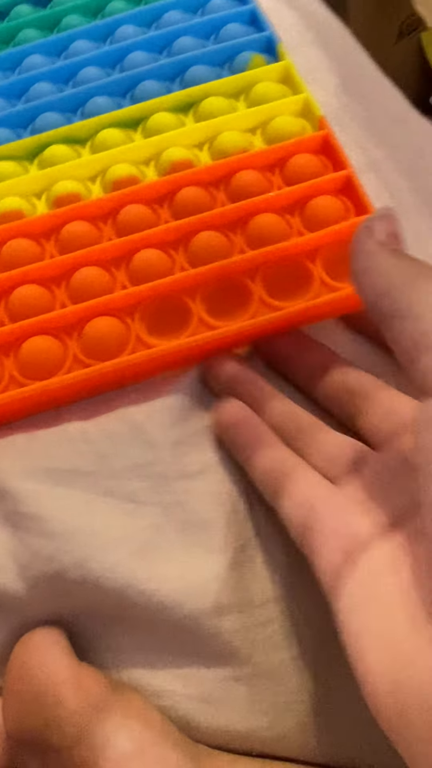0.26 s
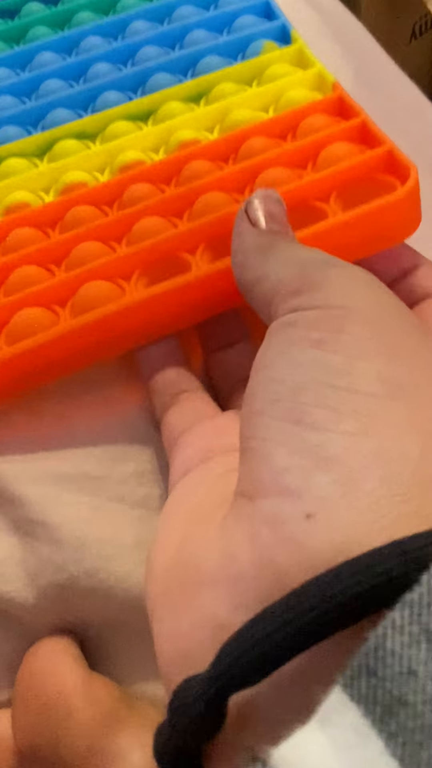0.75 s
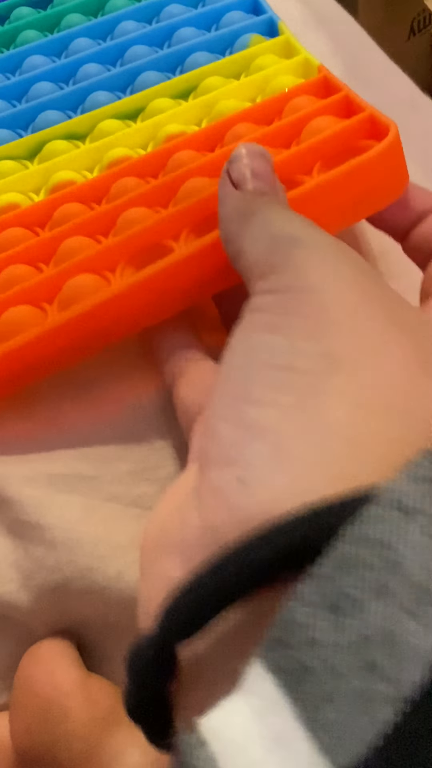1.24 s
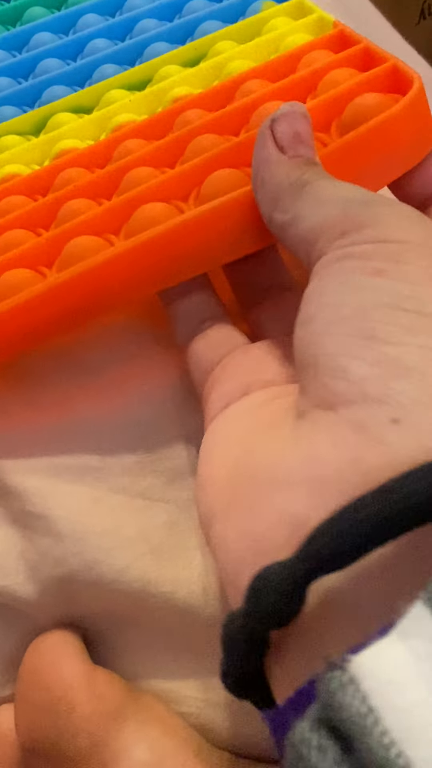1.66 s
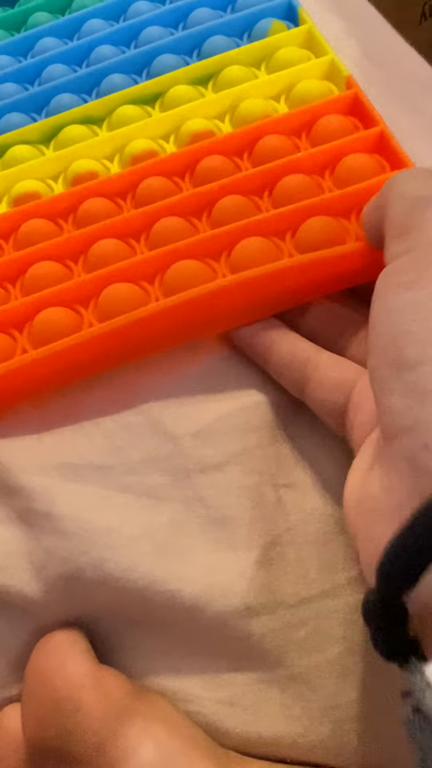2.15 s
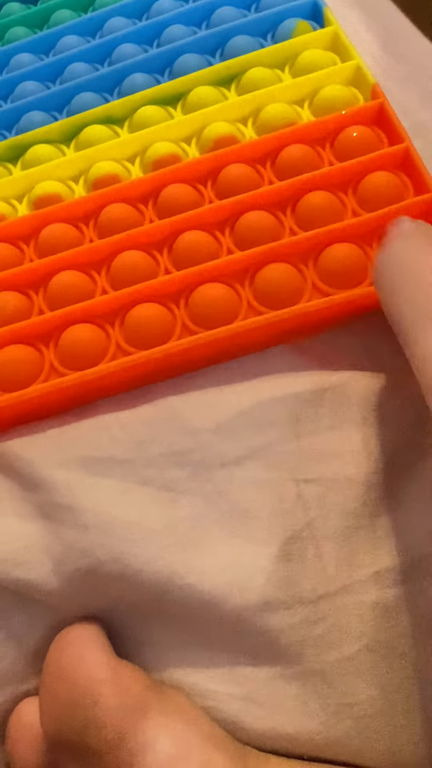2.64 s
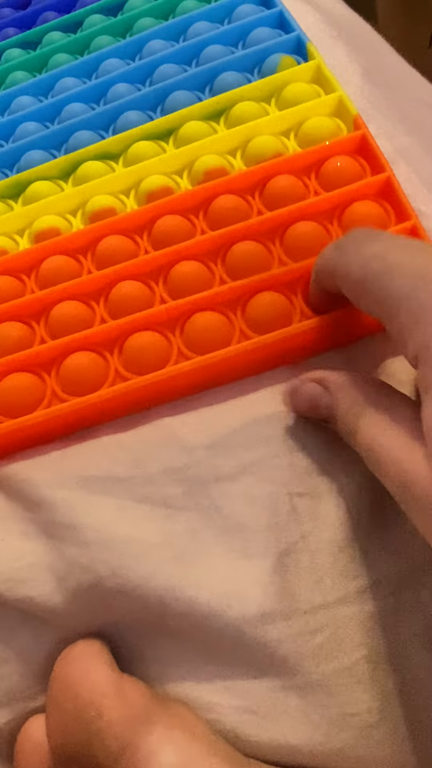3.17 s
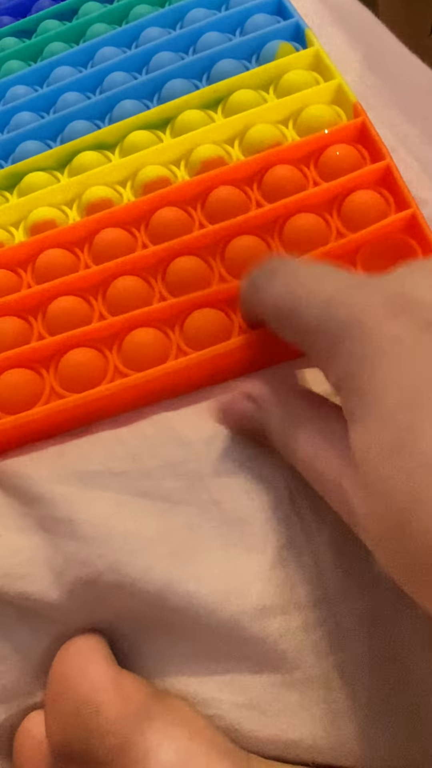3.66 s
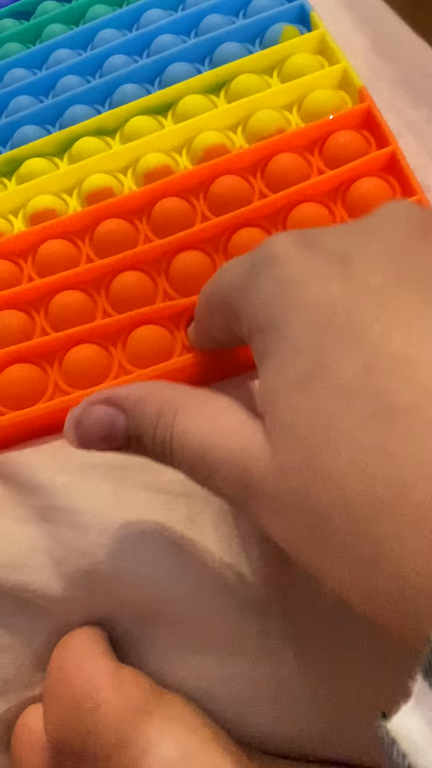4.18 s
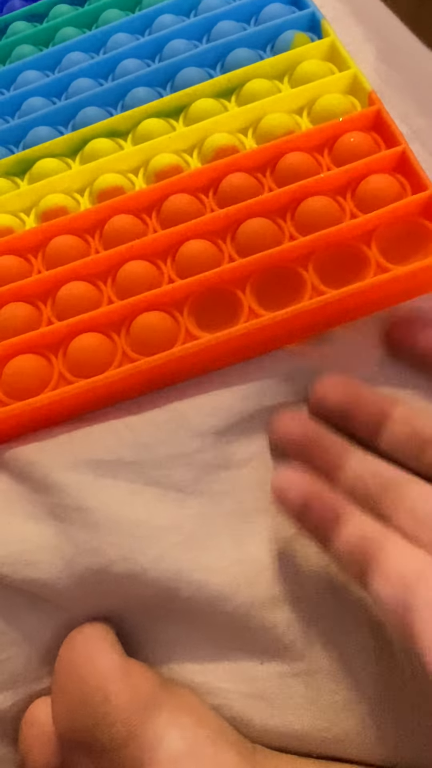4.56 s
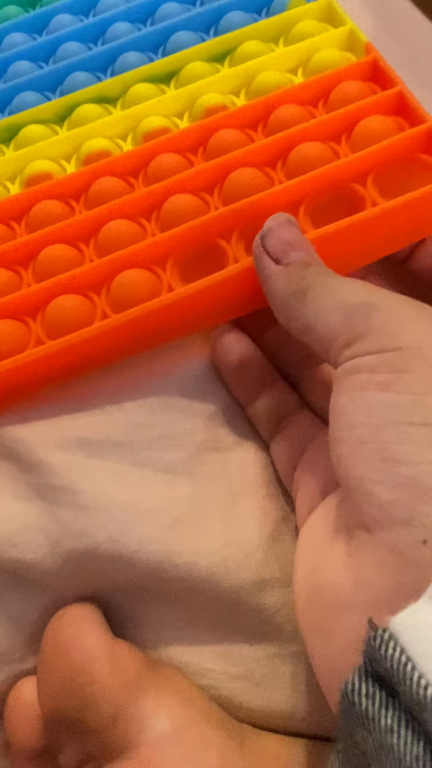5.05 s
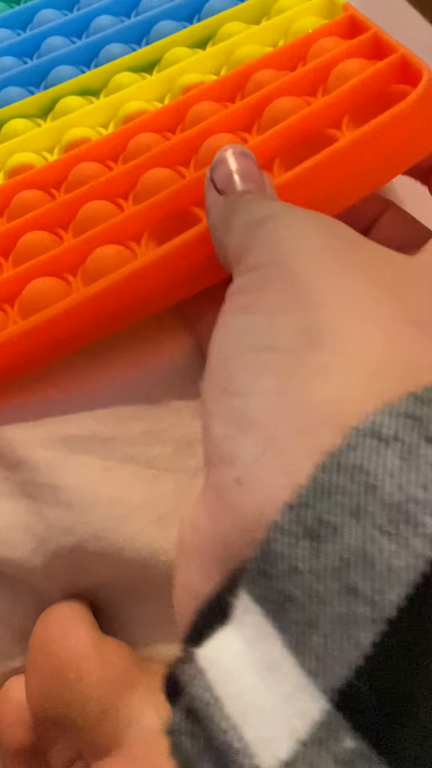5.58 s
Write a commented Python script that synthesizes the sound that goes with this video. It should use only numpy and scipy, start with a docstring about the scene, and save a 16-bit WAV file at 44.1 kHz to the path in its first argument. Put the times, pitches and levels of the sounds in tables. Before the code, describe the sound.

A hand handles a silicone bubble fidget toy on bedding, close to the microphone. Soft thumps, cloth brushing and a few faint pops lead to a quick cluster of sharp pops. Light clicks and skin rubbing follow, then two more distinct pops and a last brush of fabric. A low hum and rumble fill the small room throughout.

```python
"""Domes of a soft silicone sheet snap through under fingertips, each a short falling pop.
The sheet flexes with low thumps, skin sticks and slips on it, and hand and sheet brush the bedding.
All of it is close to a pair of microphone ports, where the moving hand stirs the air.
A low hum and rumble fill the small room."""
import sys
import numpy as np
from scipy import signal
from scipy.fft import rfft, irfft
from scipy.io import wavfile

SR = 44100
rng = np.random.default_rng(int(sys.argv[2]) if len(sys.argv) > 2 else 0)


def transcribe(u):
    """Save the signal u as a 16-bit wav file named by the first command-line argument.

    u: samples, shape (n,) or (channels, n), limited to [-1, 1]; the rate is SR.
    q: integer samples, one column per channel.
    """
    v = np.clip(np.atleast_2d(u).T, -1, 1)
    q = np.round(v * 32767).astype(np.int16)
    wavfile.write(sys.argv[1], SR, q)


N = 256662

# dome snaps: t/s, level/dB, pocket f/Hz, glide/ratio, t60/cycles, wall f/Hz, wall/dB, snap f/Hz, snap/dB,
# fizz/dB, left-right/dB; wall, snap and fizz re level
POPS = [(0.145, -45, 940, 1.5, 4.9, 2330, 4.5, 5350, -3, -14, -4),
        (0.773, -40.5, 770, 0.17, 22, 3000, -48, 5500, -49, -50, 4),
        (1.0762, -45.5, 730, 0.52, 13, 3000, -43, 5500, -42, -40, 2),
        (1.4590, -26, 606, 4.9, 3.7, 2370, -6.5, 6400, -18.5, -13, -0.5),
        (1.5146, -14, 1160, 3.1, 6.7, 3160, -5, 5780, -11, -20.5, -0.5),
        (1.571, -20.5, 765, 4.07, 4.4, 1990, -4, 6300, -19.5, -11.5, -0.5),
        (1.5915, -17.5, 1427, 0.57, 11.4, 2460, 0.5, 5740, -0.5, -21, 0),
        (1.697, -41.5, 870, 2.2, 5.3, 2700, 0.5, 5990, -3, -2, -2),
        (1.701, -34, 1317, 0.33, 3.8, 2530, -14, 6760, -7, -6, 0),
        (2.1937, -38.5, 1810, 0.32, 5.3, 3230, -0.5, 5560, -8, -1, -1),
        (2.823, -58, 2360, 0.3, 8.6, 2860, -12, 6300, 3.5, -0.5, -2),
        (3.131, -41.5, 1740, 0.47, 7.3, 3250, -4, 6500, -10, 5.5, 2.5),
        (3.289, -70, 1600, 0.5, 4.2, 3000, -3, 5000, -1, -10, 0),
        (3.534, -77, 2020, 0.21, 5.3, 3030, -20.5, 5640, 18.5, 4, 1),
        (3.614, -55.5, 1665, 0.72, 7.6, 2200, -3.5, 5480, -18.5, -24, 5),
        (3.6704, -28, 1110, 1.66, 3.8, 2350, -5, 5830, -21.5, -12.5, 0),
        (3.806, -52.5, 1990, 0.14, 19, 3500, -9, 6310, -6.5, -10.5, -0.5),
        (3.934, -49.5, 1154, 2.1, 7.3, 2420, -4.5, 5530, -10.5, -12, 1.5),
        (4.105, -60.5, 987, 1.6, 5.4, 3050, -14.5, 5520, -14, -13.5, -4),
        (4.2233, -25.5, 1100, 1.06, 8.4, 2770, -5.5, 5400, -3, -20.5, 0),
        (4.242, -63.5, 2400, 0.3, 5, 4000, 7.5, 5740, 11, 4, 2),
        (4.356, -75, 2390, 0.3, 5, 4600, 4, 6200, 5, 1.5, 3.5),
        (4.445, -71, 2400, 0.3, 5, 4630, 1, 6200, 4, 17, 1),
        (4.599, -40.5, 1580, 0.92, 17, 3030, -8, 5400, -11, -1, -2.5)]
# sheet flexes: t/s, level/dB, final f/Hz, t60/s
THUMPS = [(0.272, -36.5, 297, 0.02), (0.297, -33.5, 290, 0.049), (0.309, -34, 290, 0.027),
          (0.425, -29, 60.5, 0.089), (0.504, -34.5, 98.4, 0.22), (0.827, -25, 64, 0.1),
          (0.867, -36, 63, 0.077), (1.322, -35, 65.3, 0.19), (2.028, -33, 68.4, 0.085),
          (2.274, -29.5, 73.4, 0.21), (2.405, -36.5, 74.4, 0.25), (2.478, -33, 56, 0.22),
          (3.1312, -31.5, 317, 0.024), (3.137, -29.5, 71, 0.039), (3.6709, -30.5, 266, 0.022),
          (3.675, -27, 59.4, 0.028), (3.784, -36.5, 82, 0.11), (3.892, -32, 78.2, 0.15),
          (4.169, -37, 92, 0.11), (4.2236, -35.5, 196, 0.017), (4.598, -34.5, 414, 0.024),
          (4.738, -36, 410, 0.022), (5.241, -26.5, 82, 0.06), (5.31, -37, 69, 0.064)]
# fingertip drags: start t/s, end t/s, level/dB, centre f/Hz, band edge/centre
SCRAPES = [(0.225, 0.328, -53, 422, 1.24), (1.14, 1.257, -80, 4730, 0.66), (1.067, 1.26, -86, 4940, 1.07),
           (2.621, 2.695, -57.5, 1880, 1.25), (2.677, 2.715, -48, 2040, 1.13),
           (2.683, 2.715, -52.5, 1040, 1.38), (4.596, 4.751, -56, 1150, 1.2),
           (4.597, 4.74, -56, 2350, 1.18), (4.63, 4.76, -60, 550, 1.07), (4.715, 4.755, -56, 940, 1.2),
           (5.268, 5.382, -69.5, 2030, 1.6)]
# strokes over cloth: hold from t/s, hold to t/s, bright level/dB, dull level/dB, swell/s, fade/s
# swell and fade per 20 dB, floored at 0.02 s
STROKES = [(0.092, 0.162, -57.5, -57, 0.04, -0.04), (0.244, 0.292, -51.5, -50.5, 0.17, 0.2436),
           (0.353, 0.355, -70, -60.5, 0.46, 0.36), (0.406, 0.513, -71.5, -78, 0.5, -0.13),
           (0.52, 0.608, -62.5, -66.5, -0.96, 0.13), (0.644, 0.666, -68.5, -67, 0.2, 0.14),
           (0.77, 0.785, -78.5, -70.5, 0.04, 0.6), (0.922, 1.01, -74, -69.5, 0.1, 1.5),
           (1.272, 1.357, -68.5, -73.5, -0.3, 0), (1.97, 2.026, -81, -71, 1.3, 8),
           (2.103, 2.116, -59.5, -63, 0.1, 0.2), (2.2, 2.216, -67, -76.5, -9, 0),
           (2.294, 2.34, -69, -81, -0.7, 0.5), (2.373, 2.43, -64.5, -76.5, 0, -0.08),
           (2.47, 2.584, -65.5, -69, -0.35, 0.46), (2.632, 2.67, -62.5, -66, 0.1, -0.03),
           (2.685, 2.708, -55, -53.5, -0.01, -0.09), (2.733, 2.845, -68.5, -69.5, 0.46, -0.12),
           (2.96, 2.994, -76.5, -83.5, -4, -0.03), (3.092, 3.127, -72, -75, -0.34, -0.05),
           (3.13, 3.186, -63.5, -64, 0.025, -0.07), (3.64, 3.67, -78.5, -77, -0.13, 0.07),
           (3.285, 3.308, -79, -75, 0.03, -0.9), (3.364, 3.432, -81, -80, 0.1, -0.05),
           (3.696, 3.828, -77, -81.5, 0.3, -0.1), (3.945, 3.956, -77.5, -73, 0.04, 0.17),
           (4.407, 4.495, -74.5, -79.5, 0.14, 0.6), (4.542, 4.567, -60.5, -70.5, 0.07, 0.07),
           (4.603, 4.728, -52, -52.5, 0.0334, 0.11), (4.767, 4.81, -61.5, -66.5, 0.15, 0.17),
           (4.883, 4.968, -60.5, -67.5, 0, 0.09), (5.272, 5.367, -66.5, -68, 0.15, 0.14),
           (5.43, 5.507, -70, -78, 0, 0.2), (5.54, 5.641, -69, -76.5, 0, 0.1),
           (5.799, 5.83, -71.5, -78.5, 0, 0.1)]
# cloth friction spectra, bright and dull: f/Hz, level/dB
CLOTH_BRIGHT = [(1500, -19), (1900, -5.5), (2400, 3), (2800, -3.5), (3300, 1), (4200, 0.5), (4800, -2),
                (5500, 3), (6500, 0), (7800, -1), (9000, -7.5), (11000, -12.5), (12400, -12), (13500, -18),
                (15500, -20), (16500, -38.5)]
CLOTH_DULL = [(220, -17.5), (400, 10.5), (560, 2), (780, 2), (1100, 0.5), (1600, -5.5), (2300, -10.5),
              (3000, -34)]
# edges of the hiss bands: f/Hz
HISS_EDGES_HZ = [1000, 2800, 4800, 8500, 16000]
# air stirred by the hand: start t/s, end t/s, level/dB, centre f/Hz
STIRS = [(0.205, 0.346, -52, 400), (1.433, 1.485, -41.5, 600), (1.489, 1.557, -44, 790),
         (1.565, 1.606, -45, 750), (2.235, 2.366, -48, 250), (2.64, 2.72, -42.5, 450), (3.1, 3.2, -48, 403),
         (3.68, 3.8, -51, 348), (4.207, 4.248, -46, 900), (4.35, 4.556, -49, 300), (4.401, 4.52, -59, 720),
         (4.585, 4.77, -48.5, 600), (5.5, 5.618, -51.5, 347)]
# left port's lead on near sounds: f/Hz, phase/rad
PORT_LEAD = [(300, .1), (2000, .4), (3400, 1.4), (5500, 1.6), (7600, 2.2), (8600, 2.9), (10400, 3.3),
             (11700, 3.9), (13700, 4.2), (16000, 5.7)]
# room rumble spectra, in phase and opposed at the ports: f/Hz, level/dB
RUMBLE_COMMON = [(12, -39.5), (20, -12.5), (38, 0.5), (70, 0), (143, -8), (221, -5), (308, -8), (341, -7.5),
                 (369, -10.5), (398, -8), (716, -35), (1110, -47), (3500, -66), (5540, -63.5), (9000, -81),
                 (11700, -109), (19800, -120)]
RUMBLE_OPPOSED = [(12, -51), (20, -20), (60, -13.5), (98, -3.5), (249, -14.5), (397, -10.5), (551, -15),
                  (1220, -24), (1480, -33), (2290, -35.5), (3100, -39.5), (4080, -47), (14000, -65.5)]
# hum tones: f/Hz, width/Hz, level/dB
HUM = [(83.25, 5, -55), (118.7, 1.8, -54.5), (232.2, 8, -64.5), (300.4, 8, -63), (393.4, 3, -63)]


def pops():
    """A dome's air pocket rings, falling as it opens; wall, snap, rim, fizz and a low push join it."""
    push_hz, rim_hz, fizz_peak_s, silicone_top_hz = 558, 4150, 0.00069, 11800
    push = falling_ring(push_hz, t60_s=0.0053, rise_s=0.00065, glide=0.54, glide_s=0.001)
    rim = falling_ring(rim_hz, t60_s=0.0028, rise_s=0.00034, glide=0.2, glide_s=0.00037)
    age = np.arange(300) / SR / fizz_peak_s
    bursts = rng.standard_normal((len(POPS), len(age))) * age * np.exp(1 - age)
    fizzes = butter(bursts, [7300, 10900], "band")
    out = np.zeros((2, N))
    for pop, fizz in zip(POPS, fizzes):
        at_s, db, hz, glide, cycles, wall_hz, wall_db, snap_hz, snap_db, fizz_db, pan_db = pop
        pocket = falling_ring(hz, t60_s=cycles / hz, rise_s=0.45 / hz, glide=glide, glide_s=0.4 / hz)
        wall = falling_ring(wall_hz, t60_s=0.0036, rise_s=0.00045, glide=0.13, glide_s=0.00053)
        snap = falling_ring(snap_hz, t60_s=0.0026, rise_s=0.00031, glide=0.078, glide_s=0.00023)
        sides = from_db(db + np.array([[pan_db], [-pan_db]]) / 2)
        rings = [(-pocket, 0), (push, -12.5), (wall, wall_db), (-snap, snap_db), (rim, snap_db - 3.5)]
        for ring, ring_db in rings:
            add(out, sides * from_db(ring_db) * ring, at_s)
        add(out, sides * from_db(fizz_db) * fizz, at_s - 0.0005)
    out = butter(out, silicone_top_hz, order=5)
    thin = butter(out, [1400, 6500], "band")
    pre_tick = from_db(-23) * np.roll(thin, -round(0.0076 * SR), axis=1)
    bounce = from_db(-20.5) * np.roll(out, round(0.0028 * SR), axis=1)   # off hand and bedding
    wall_echo = from_db(-22.5) * np.roll(thin, round(0.0102 * SR), axis=1)
    return out + pre_tick + bounce + wall_echo


def thumps():
    """The slack sheet swings, slowing as it settles; a harder flex starts tauter."""
    taut_hz, doubling_db = 260, 9
    out = np.zeros(N)
    for at_s, db, hz, t60_s in THUMPS:
        excess_hz = taut_hz * 2 ** ((db + 30) / doubling_db)
        ring = falling_ring(hz, t60_s, rise_s=0.0033, glide=excess_hz / hz, glide_s=0.0028)
        add(out, from_db(db) * ring, at_s)
    return out * from_db([[-0.3], [0.3]])


def scrapes():
    """Skin sticks and slips on the sheet; each slip rings a resonance."""
    slips_per_s, attack_s, release_s = 900, 0.0063, 0.017
    t, out = np.arange(N) / SR, np.zeros(N)
    slips = (rng.random(N) < slips_per_s / SR) * rng.standard_normal(N)
    slips += 0.098 * rng.standard_normal(N)
    for start_s, end_s, db, hz, edge_ratio in SCRAPES:
        envelope = np.clip(np.minimum((t - start_s) / attack_s, (end_s - t) / release_s), 0, 1)
        out += from_db(db) * envelope * unit_band(slips, hz, max(edge_ratio, 1.07))
    return out


def brushing_gains():
    """Bright and dull gains: strokes, a jolt of the sheet per pop and faint resting rub add in power."""
    jolt_bright_db, jolt_dull_db, jolt_swell_s, jolt_fade_s = -35.5, -35, 0.017, 0.054
    rest_bright_db, rest_dull_db = -95.5, -81
    jolts = [(at_s, at_s, db + snap_db + jolt_bright_db, db + jolt_dull_db, jolt_swell_s, jolt_fade_s)
             for at_s, db, *_, snap_db, _fizz_db, _pan_db in POPS]
    t = np.arange(0, N, 64) / SR
    power = from_db([[rest_bright_db], [rest_dull_db]]) ** 2
    for start_s, end_s, bright_db, dull_db, swell_s, fade_s in STROKES + jolts:
        before = (start_s - t) / max(swell_s, 0.02)
        after = (t - end_s) / max(fade_s, 0.02)
        drop_db = 20 * np.clip(np.maximum(before, after), 0, None)
        power = power + from_db(np.array([[bright_db], [dull_db]]) - drop_db) ** 2
    return [np.interp(np.arange(N) / SR, t, gain) for gain in np.sqrt(power)]


def brushing():
    """Cloth rubbing: a dense, grainy hiss, with random level flicker added per band."""
    bright_gain, dull_gain = brushing_gains()
    grains = rng.standard_normal((3, N)) * from_db(3.5 * rng.standard_normal((3, N)))
    cloth = grains[0] + from_db(-31.5) * grains[1:]   # one shared spot, a wider patch per port
    spectrum, hz = rfft(coloured(cloth, CLOTH_BRIGHT)), np.fft.rfftfreq(N, 1 / SR)
    bright = np.zeros((2, N))
    for low_hz, high_hz in zip(HISS_EDGES_HZ, HISS_EDGES_HZ[1:]):
        flicker = from_db(2.0 * drift(7.2) + 0.38 * drift(35))
        bright += flicker * irfft(spectrum * (hz >= low_hz) * (hz < high_hz), N)
    dull = from_db(2.1 * drift(18)) * coloured(cloth, CLOTH_DULL)
    return bright_gain * bright + dull_gain * dull


def air_stirs():
    """Air moved by the hand pushes one port as it pulls the other: lumpy low noise."""
    ramp_s = 0.012
    t, out = np.arange(N) / SR, np.zeros(N)
    air = rng.standard_normal(N) * from_db(3.3 * drift(48))
    for start_s, end_s, db, hz in STIRS:
        envelope = np.clip(np.minimum(t - start_s, end_s - t) / ramp_s, 0, 1)
        out += from_db(db) * envelope * unit_band(air, hz, edge_ratio=1.6)
    return out * [[1], [-1]]


def room_reverb(x):
    """Wall reflections build into a short, dense stereo tail."""
    build_s, low_t60_s, high_t60_s, split_hz = 0.0071, 0.15, 0.18, 1000
    t = np.arange(int(0.4 * SR)) / SR
    noise = rng.standard_normal((2, len(t))) * (1 - np.exp(-(t / build_s) ** 2))
    noise = butter(noise, 6500)   # bedding absorbs the top
    low = butter(noise, split_hz, order=1)
    tail = low * from_db(-60 * t / low_t60_s) + (noise - low) * from_db(-60 * t / high_t60_s)
    tail /= np.sqrt(np.sum(tail ** 2) / 2)
    return signal.fftconvolve(x[None], tail, axes=1)[:, :N]


def rumble_and_hum():
    """Lumpy room rumble and wavering hum tones; the low mids lean right."""
    common_db, opposed_db, lean_db, lean_hz = -47.5, -54.5, 5, 260
    noise = rng.standard_normal((2, N))
    common = from_db(common_db + 1.3 * drift(4)) * coloured(noise[0], RUMBLE_COMMON)
    opposed = from_db(opposed_db + 0.7 * drift(3.6)) * coloured(noise[1], RUMBLE_OPPOSED)
    for hz, width_hz, db in HUM:
        turns = np.cumsum(hz + width_hz / 2 * drift(6)) / SR
        common += np.sqrt(2) * from_db(db + 0.29 * drift(0.99)) * np.sin(2 * np.pi * turns)
    low_mids = np.exp(-(np.log(np.fft.rfftfreq(N, 1 / SR) / lean_hz + 1e-9) / 0.38) ** 2)
    lean = from_db(lean_db / 2 * low_mids * [[-1], [1]])
    return irfft(rfft(common + opposed * [[1], [-1]]) * lean, N)


def at_ports(x):
    """Near sounds reach the left port first; the ports are in antiphase around 10 kHz."""
    hz, lead_rad = np.transpose(PORT_LEAD)
    lag = np.exp(-1j * np.interp(np.fft.rfftfreq(N, 1 / SR), hz, lead_rad))
    return np.array([x[0], irfft(rfft(x[1]) * lag, N)])


def falling_ring(hz, t60_s, rise_s, glide, glide_s):
    """Damped sine sagging from hz * (1 + glide) to hz; peak 1."""
    t = np.arange(int(1.2 * t60_s * SR) + 8) / SR
    turns = hz * (t + glide * glide_s * (1 - np.exp(-t / glide_s)))
    envelope = (1 - np.exp(-t / rise_s)) ** 2 * from_db(-60 * t / t60_s)
    ring = envelope * np.sin(2 * np.pi * turns)
    return ring / np.max(np.abs(ring))


def coloured(x, spectrum):
    """x shaped by an (f/Hz, level/dB) table; rms 1."""
    table_hz, table_db = np.transpose(spectrum)
    hz = np.maximum(np.fft.rfftfreq(N, 1 / SR), 1)
    gain_db = np.interp(np.log(hz), np.log(table_hz), table_db, left=-120, right=-120)
    return unit_rms(irfft(rfft(x) * from_db(gain_db), N))


def drift(corner_hz):
    """Slow random wander; rms 1."""
    poles = [1, -np.exp(-2 * np.pi * corner_hz / SR)]
    smoothed = signal.lfilter([1], poles, rng.standard_normal(N + SR))
    return unit_rms(signal.lfilter([1], poles, smoothed)[SR:])


def butter(x, hz, kind="low", order=2):
    return signal.sosfilt(signal.butter(order, hz, kind, fs=SR, output="sos"), x)


def unit_band(x, hz, edge_ratio):
    return unit_rms(butter(x, [hz / edge_ratio, hz * edge_ratio], "band"))


def unit_rms(x):
    return x / np.sqrt(np.mean(x ** 2) + 1e-20)


def from_db(db):
    return 10 ** (np.asarray(db) / 20)


def add(track, sound, at_s):
    start = round(at_s * SR)
    track[..., start:start + sound.shape[-1]] += sound[..., :N - start]


def scene():
    """Stereo mix; only the pops feed the reverb."""
    domes = pops()
    reverb = from_db(-21) * room_reverb(domes.mean(axis=0))
    near = at_ports(domes + reverb + brushing() + scrapes())
    return near + thumps() + rumble_and_hum() + air_stirs()


def record(dry):
    """Microphone: deep bass dropped, top cut steeply."""
    bass_hz, stop_hz = 38, 16400
    top_cut = signal.cheby2(12, 70, stop_hz, fs=SR, output="sos")
    return signal.sosfilt(top_cut, butter(dry, bass_hz, "high"))


dry = scene()
out = record(dry)
transcribe(out)
```